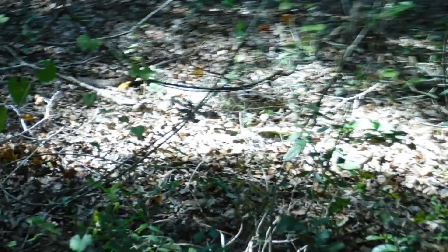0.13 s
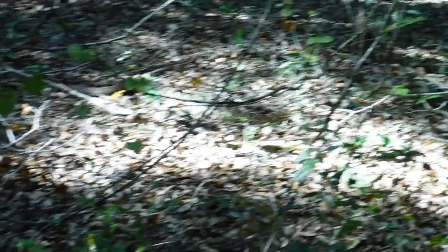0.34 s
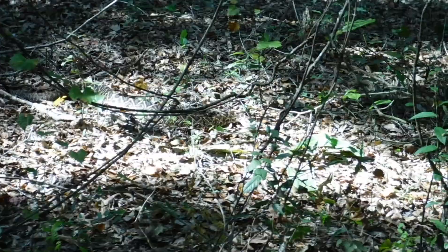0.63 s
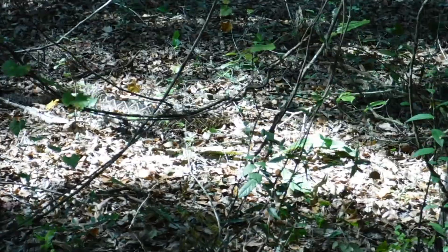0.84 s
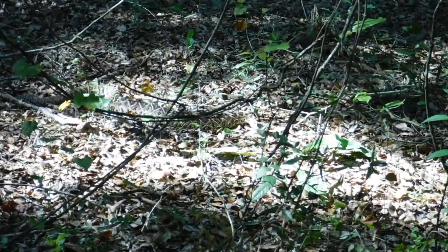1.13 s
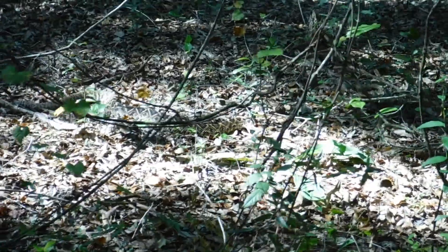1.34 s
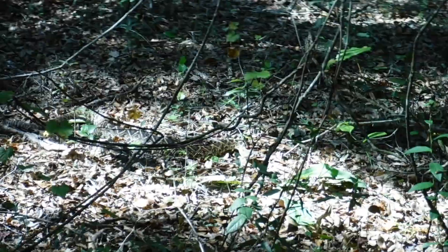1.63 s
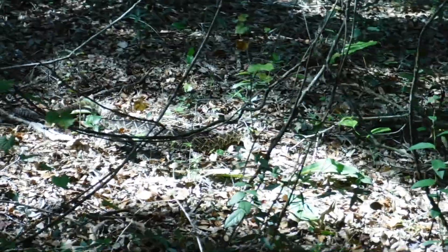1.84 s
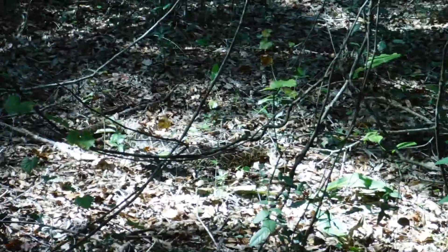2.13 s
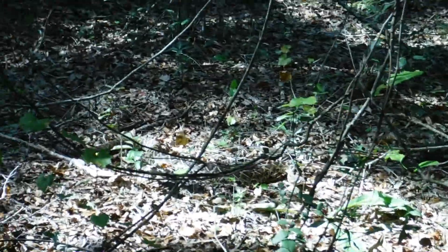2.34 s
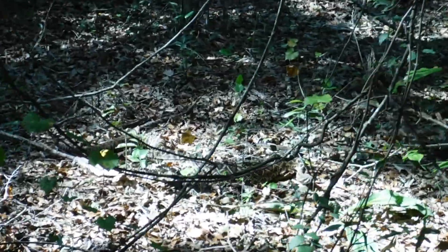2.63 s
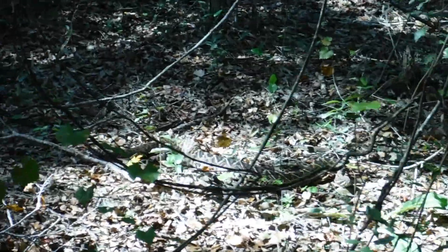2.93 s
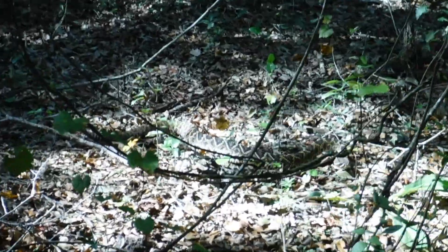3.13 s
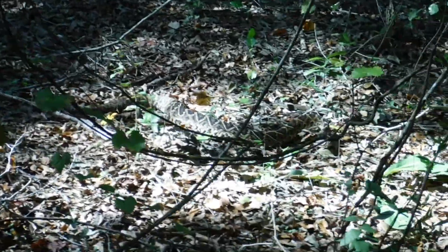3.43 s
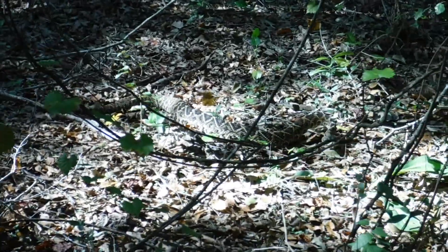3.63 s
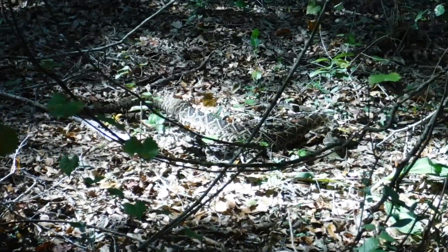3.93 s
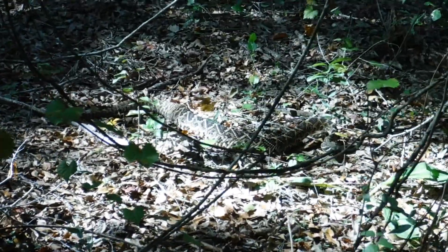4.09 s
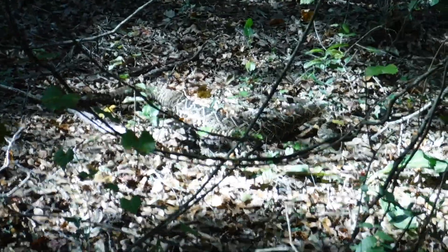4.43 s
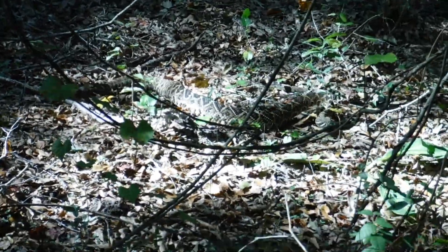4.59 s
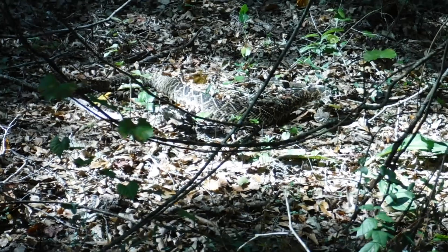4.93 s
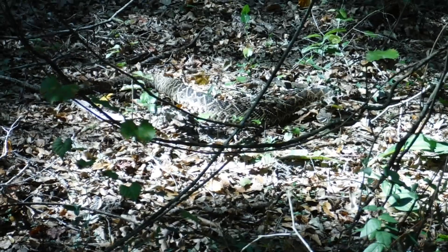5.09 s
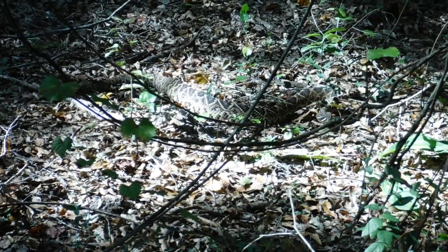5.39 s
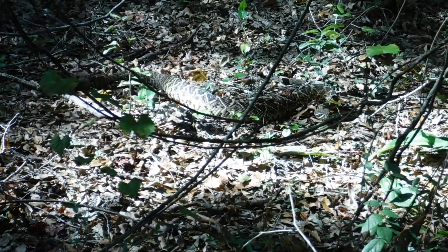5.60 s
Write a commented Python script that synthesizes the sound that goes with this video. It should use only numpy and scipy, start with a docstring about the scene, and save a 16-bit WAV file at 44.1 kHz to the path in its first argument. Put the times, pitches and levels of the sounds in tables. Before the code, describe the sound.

A large snake moves through dry leaf litter close to the microphone, starting at once with a crisp burst of crackling over the hiss of sliding scales. It pushes in uneven surges: from the start to about 0.7 seconds, from 1 to 1.5, briefly near 1.9, and from 2.3 to 3.1. Leaves buckle with sharp, bright clicks, and twigs snap near 0.4, 0.7, 1 and 1.7 seconds, loudest at 2. A soft, hollow ground thump comes at 1.8 seconds and a weaker one at 2, while a faint low rumble swells and fades. After a small push and snap around 3.4 seconds, the rustle sinks to a faint creep with scattered ticks. The woodland behind stays very quiet throughout: still air, faint insects, a distant low hum and a hollow drone. At about 5.2 seconds a far bird gives one faint, thin, falling call.

```python
"""Dry leaves crackle close to the microphone: a large snake pushes through the litter of a woodland floor in
several surges, then settles to a faint creep. Its scales hiss, leaves buckle and twigs snap, each break shaking
the litter around it; a low rumble swells and two of the snaps land with a soft, deep thud. Farther off the wood
is quiet: faint insects, a hum, a hollow drone and, late on, one thin falling bird call."""
import sys
import numpy as np
from scipy import signal
from scipy.fft import rfft, irfft
from scipy.io import wavfile
from scipy.ndimage import uniform_filter1d

SR = 44100
rng = np.random.default_rng(int(sys.argv[2]) if len(sys.argv) > 2 else 0)


def log_audio(samples):
    """Write samples as a 16-bit WAV file to the path given in sys.argv[1]."""
    # one column per channel
    frames = np.atleast_2d(samples).T
    # limit to full scale, then quantise
    limited = np.clip(frames, -1, 1)
    pcm = np.round(limited * 32767).astype(np.int16)
    wavfile.write(sys.argv[1], SR, pcm)


N = 253575


def undb(db):
    """Decibels to gain."""
    return 10 ** (np.asarray(db) / 20)


def unit(x):
    """Scale to rms 1."""
    return x / np.sqrt(np.mean(x ** 2))


def curve(table):
    """Rows of (time, value), joined by straight lines."""
    return np.interp(np.arange(N) / SR, *np.transpose(table))


def add(out, s, sound):
    """Mix a sound in at s seconds."""
    i = max(int(s * SR), 0)
    out[i:i + len(sound)] += sound[:len(out) - i]


def response(spectrum, size=4096):
    """Causal impulse response of unit energy with the given spectrum."""
    hz, db = np.transpose(spectrum)
    f = np.maximum(np.arange(size // 2 + 1) * SR / size, 1)
    gain = undb(np.interp(np.log(f), np.log(hz), db))
    cepstrum = irfft(np.log(gain))
    cepstrum[1:size // 2] *= 2  # fold to minimum phase
    cepstrum[size // 2 + 1:] = 0
    h = irfft(np.exp(rfft(cepstrum)))
    return h / np.linalg.norm(h)


def through(x, h):
    """Pass a sound through an impulse response."""
    return signal.fftconvolve(x, h)[:len(x)]


def ring(x, hz, width_hz):
    """One resonance, gain 1 at its centre."""
    return signal.lfilter(*signal.iirpeak(hz, hz / width_hz, fs=SR), x)


def ring_twice(x, hz, width_hz):
    """The same resonance twice over, for steeper skirts."""
    return ring(ring(x, hz, width_hz), hz, width_hz)


def drift(per_s):
    """Smooth random wander of rms 1."""
    k = int(SR / per_s)
    return unit(uniform_filter1d(np.repeat(rng.standard_normal(N // k + 1), k), k)[:N])


def attack_hold_release(start_s, attack_s, hold_s, release_s):
    """Gain that rises evenly to 1, holds and dies away."""
    t = np.arange(N) / SR - start_s
    return np.clip(t / attack_s, 0, 1) * np.exp(-np.maximum(t - attack_s - hold_s, 0) / release_s)


def fracture(splinter_db, decay_s, size=2048):
    """One sharp break followed by a dying spray of splinters."""
    t = np.arange(size) / SR
    spray = rng.standard_normal(size) * np.exp(-t / decay_s) * (1 - np.exp(-t / 0.00019))
    spray *= undb(splinter_db) / np.linalg.norm(spray)
    spray[0] = 1
    return spray


# The snake's pushes, close to the microphone: start t/s, attack/s, hold/s, rustle level/dB
SNAKE_PUSHES = [(-0.02, 0.016, 0.026, -32.5), (0.04, 0.082, 0.32, -39.5), (0.463, 0.063, 0.04, -40),
                (0.6, 0.04, 0.082, -48.5), (0.961, 0.17, 0.28, -39), (1.201, 0.047, 0.051, -36),
                (1.42, 0.048, 0.13, -46), (1.81, 0.04, 0.19, -44.5), (2.351, 0.054, 0.035, -33),
                (2.455, 0.022, 0.021, -39), (2.584, 0.083, 0.3, -41.5), (3.0, 0.03, 0.099, -47),
                (3.377, 0.044, 0.036, -45.5), (3.477, 0.019, 0.032, -49.5)]
# Its slow creep between pushes: t/s, rustle level/dB
SNAKE_CREEP = [(0.0, -40.5), (0.9, -58.5), (1.72, -50.5), (2.16, -55), (3.3, -52), (3.65, -57),
               (4.17, -57.5), (4.35, -61), (4.75, -66.5), (5.17, -71), (5.23, -61.5), (5.75, -63.5)]


def litter_stirring(shake_db=-30.5, bend_s=0.0081, settle_s=0.031):
    """Rustle level in dB: the creep, the pushes, and leaves shaken as a leaf or twig bends and breaks."""
    power = undb(curve(SNAKE_CREEP)) ** 2
    for s, attack_s, hold_s, db in SNAKE_PUSHES:
        power += (undb(db) * attack_hold_release(s, attack_s, hold_s, release_s=0.045)) ** 2
    t = np.arange(N) / SR
    for s, db, *_ in LEAF_CRACKS + TWIG_SNAPS:
        near = slice(max(int((s - .5) * SR), 0), int((s + .5) * SR))
        shake = np.exp(-np.maximum((s - t[near]) / bend_s, (t[near] - s) / settle_s))
        power[near] += (undb(db + shake_db) * shake) ** 2
    return 10 * np.log10(power)


# Spectrum of the dry surface leaves at close range: f/Hz, level/dB
LEAF_SPECTRUM = [(1200, -25.5), (2200, -20), (3100, -14.5), (4300, -12), (5400, -5), (6200, -3),
                 (7000, -6.5), (8300, -11), (10000, -14.5), (12500, -16), (16000, -22.5)]
# Spectrum of the deeper litter under the snake: f/Hz, level/dB
DEEP_LITTER_SPECTRUM = [(100, -27), (280, -4.5), (700, -3), (1000, -1.5), (1700, 0.5), (2400, -6),
                        (3500, -5), (5000, -2), (9000, -47.5)]


def rustle(fractures_per_s=2600, pings_per_s=190, ping_db=-2.5, clump_db=1.5, ordinary_push_db=-40):
    """Thousands of tiny fractures and pings of single leaves, in clumps, over the hiss of scales sliding."""
    level_db = litter_stirring()
    push_db = level_db - ordinary_push_db
    clumps = undb(clump_db * drift(130))
    # in a fast surge the sliding hiss fills the gaps between the fractures
    slide = undb(-8 + 0.23 * (level_db - np.median(level_db)))

    def breaks(per_s, spread_db=5, largest_db=19.5):
        """Impulses at random moments: many small, a few large."""
        when, size = rng.random((2, N))
        return (when < per_s / SR) * undb(np.minimum(-spread_db * np.log(size), largest_db))

    def grains(sizes, colour_db=4):
        """The fractures in one band, each with its own strength there, plus the sliding hiss."""
        ticks = sizes * undb(colour_db * rng.standard_normal(N)) * rng.choice([-1, 1], N)
        return unit(unit(ticks) + slide * rng.standard_normal(N))

    sizes = breaks(fractures_per_s)
    edges_hz = [1500, 4200, 6200, 8200, 11500, 17000]
    crackle = sum(signal.sosfilt(signal.butter(2, band, "band", fs=SR, output="sos"), grains(sizes))
                  for band in zip(edges_hz, edges_hz[1:]))
    # each leaf has its own pitch and rings for about a millisecond
    pings = sum(ring_twice(breaks(pings_per_s), hz, width_hz=1100) for hz in range(3400, 15000, 750))
    leaves = unit(crackle) + undb(ping_db) * unit(pings)
    surface = unit(clumps * through(leaves, response(LEAF_SPECTRUM)))
    treble = signal.sosfiltfilt(signal.butter(2, 8600, "high", fs=SR, output="sos"), surface)
    surface += treble * (undb(0.046 * push_db) - 1)  # harder pushes are brighter
    crunch = unit(clumps * through(grains(sizes), response(DEEP_LITTER_SPECTRUM)))
    crunch_db = -50 + 0.73 * push_db  # the deeper litter follows the push less steeply
    return surface * undb(level_db) + crunch * undb(crunch_db)


# Spectrum of the still air among the trees: f/Hz, level/dB
AIR_SPECTRUM = [(20, -8), (85, -7.5), (150, -8), (290, -12.5), (600, -18), (850, -17.5), (1030, -22),
                (1570, -17), (1900, -25), (3500, -26), (6000, -22.5), (9000, -28.5), (15800, -33.5)]
# Tones of the far hum: f/Hz, level/dB against the main tone
HUM_TONES = [(138.2, 0), (116.7, -5.5)]
# Slow course of its main tone at the microphone: t/s, level/dB
HUM_COURSE = [(0.0, -64), (1.4, -73), (1.9, -61.5), (2.5, -62.5), (3.0, -71.5), (4.2, -70.5), (4.55, -64),
              (5.75, -65.5)]


def woodland(air_db=-56.5, drone_db=-64.5, insect_db=-72.5):
    """Still air all around, with a far hum, a hollow distant drone and a faint insect chorus."""
    air = unit(through(rng.standard_normal(N), response(AIR_SPECTRUM)))
    air *= undb(air_db + .5 * drift(1.68))
    hum = np.zeros(N)
    for hz, db in HUM_TONES:
        rms = undb(curve(HUM_COURSE) + db + 1.5 * drift(5.7))
        phase = 2 * np.pi * np.cumsum(hz + drift(6)) / SR
        hum += np.sqrt(2) * rms * np.sin(phase)
    drone = unit(ring_twice(rng.standard_normal(N), 1292, width_hz=190))
    drone *= undb(drone_db + drift(6.1))
    insects = unit(ring(ring(rng.standard_normal(N), 5160, width_hz=300), 5130, width_hz=300))
    insects *= undb(insect_db + 2.9 * drift(9))
    return air + hum + drone + insects


# The loudest leaves, close to the microphone: t/s, peak level/dB of the blade, its ring f/Hz
LEAF_CRACKS = [(0.0065, -11.5, 5850), (0.0263, -17, 5700), (0.048, -8.5, 6200), (0.1717, -11, 6130),
               (0.2867, -15.5, 6050), (0.2944, -13.5, 7060), (0.3957, -17, 5500), (0.4038, -14.5, 5940),
               (0.4341, -11, 6600), (0.5407, -21, 5650), (0.7702, -27, 6200), (1.1414, -19, 5130),
               (1.1674, -15, 6150), (1.3138, -18.5, 5800), (1.3763, -17, 6200), (1.4994, -24, 6700),
               (1.8141, -23, 7400), (1.894, -15.5, 6650), (1.9097, -19, 6950), (2.1532, -29, 5900),
               (2.2233, -19.5, 5270), (2.394, -16.5, 6550), (2.485, -20.5, 5800), (2.515, -15.5, 6200),
               (2.7085, -19.5, 5930), (2.8057, -18, 6000), (2.8919, -17, 6000), (2.917, -21, 6800),
               (2.9861, -13.5, 6950), (3.072, -20, 6250), (3.0994, -25, 6630), (3.2172, -27.5, 6950),
               (3.4163, -23.5, 6450), (3.7529, -35, 6600), (3.8398, -35, 6950), (3.895, -33.5, 5400),
               (4.1764, -33.5, 5750), (4.2346, -36, 5800), (4.3873, -34, 5250), (5.035, -42, 6000),
               (5.3804, -33, 6540), (5.4143, -37, 6900), (5.6072, -36, 6000)]


def leaf_cracks(blade_s=.00013, tear_db=-4.5, edge_db=-11, edge_spread_db=1.5):
    """A leaf buckles: its blade swells and rings for half a millisecond, then its torn edge splinters."""
    out, colour, t = np.zeros(N), response(LEAF_SPECTRUM), np.arange(2048) / SR
    # the brightness of the torn edge varies from leaf to leaf
    edge_gains = undb(edge_db + edge_spread_db * rng.standard_normal(len(LEAF_CRACKS)))
    for (s, db, hz), edge_gain in zip(LEAF_CRACKS, edge_gains):
        blade = unit((t / blade_s) ** 2 * np.exp(-t / blade_s) * np.sin(2 * np.pi * hz * t))
        tear = unit(through(fracture(splinter_db=9.5, decay_s=0.0033), colour))
        edge = unit(ring_twice(fracture(splinter_db=0, decay_s=.0015), 12000, width_hz=6000))
        size = undb(db) / blade.max()
        add(out, s - blade_s, size * blade)
        # it tears just after the top of the swell
        add(out, s + 2 * blade_s, size * (undb(tear_db) * tear + edge_gain * edge))
    return out


# Twigs under the snake, close by: t/s, peak level/dB, knock level/dB against the split, ring f/Hz
TWIG_SNAPS = [(0.4117, -8, -6, 3150), (0.6990, -9.5, -7, 5430), (0.9858, -12, -4, 1370),
              (1.7268, -12.5, -23, 5800), (2.0171, -5.5, 2.5, 4330), (2.2495, -17.5, -5, 3000),
              (2.3108, -23.5, 17, 1700), (2.7515, -19.5, -9, 400), (2.7926, -22.5, 4, 450),
              (3.4363, -18, -16, 1240), (4.156, -34.5, -6, 3300)]
# Spectra of the bright split and of the woody knock: f/Hz, level/dB
SPLIT_SPECTRUM = [(200, -18), (2200, -7), (3800, -2), (6000, -1), (7500, -4), (10000, -16.5), (16000, -21)]
KNOCK_SPECTRUM = [(60, -8), (200, -2.5), (750, 6), (1000, 0), (1700, 0), (2300, -5.5), (3500, -3),
                  (7000, -3), (16000, -55)]


def twig_snaps(ring_db=0.5):
    """A twig breaks: a bright split, a dull woody knock and a brief ring."""
    out = np.zeros(N)
    for s, db, knock_db, hz in TWIG_SNAPS:
        split = through(fracture(splinter_db=0.5, decay_s=0.0019), response(SPLIT_SPECTRUM))
        knock = through(fracture(splinter_db=-3.5, decay_s=0.0012), response(KNOCK_SPECTRUM))
        snap = split + undb(knock_db) * knock
        snap += undb(ring_db) * ring(snap, hz, width_hz=700)
        add(out, s, snap / np.abs(snap).max() * undb(db))
    return out


def rumble(crest_s=2.2, width_s=0.95, crest_db=-64.5):
    """A soft low rumble swells and fades near the microphone."""
    swell = np.exp(-((np.arange(N) / SR - crest_s) / width_s) ** 2 / 2)
    low_noise = unit(ring_twice(rng.standard_normal(N), 60, width_hz=120))
    return low_noise * swell * undb(crest_db + 2 * drift(13))


# Low thuds beneath breaking twigs, close by: t/s, peak level/dB
TWIG_THUDS = [(1.849, -20), (2.0172, -33)]
# Spectrum of one thump: f/Hz, level/dB
THUMP_SPECTRUM = [(40, -37), (130, -28), (200, -4), (320, -0.5), (450, -12.5), (600, -19), (900, -37),
                  (1250, -24), (2200, -27.5), (9000, -45)]


def twig_thuds():
    """Breaking twigs give soft, hollow low bumps that die within two cycles."""
    out, bump = np.zeros(N), response(THUMP_SPECTRUM)
    for s, db in TWIG_THUDS:
        add(out, s, bump / np.abs(bump).max() * undb(db))
    return out


# Harmonics of the bird, deep among the trees: multiple of the pitch, relative level/dB at quarter effort
BIRD_HARMONICS = [(2, -8), (3, 0), (4, -29)]


def bird(start_s=5.23, length_s=0.41, fade_s=0.025, waver=0.0062, rasp_db=-7, thinning=0.42):
    """A far scream that slides down, hoarse and full at first, then thinning to one whistle."""
    effort = attack_hold_release(start_s, attack_s=0.03, hold_s=0.04, release_s=0.062)
    pitch_hz = 1976 + 165 * effort
    level_db = -65 + 5 * effort
    t = np.arange(N) / SR - start_s
    sounding = np.clip(np.minimum(t, length_s - t) / fade_s, 0, 1)
    phase = 2 * np.pi * np.cumsum(pitch_hz * (1 + waver * drift(250))) / SR
    # as the effort drops, the weaker harmonics fall away
    thinness = 1 + thinning * (0.5 - 2 * effort)
    tone = sum(undb(db * thinness) * np.sin(k * phase) for k, db in BIRD_HARMONICS)
    rasp = effort ** 2 * np.sin(3.5 * phase)  # halfway between two harmonics
    return (tone + undb(rasp_db) * rasp) * sounding * undb(level_db)


def scatter(x, wet_db, decay_s):
    """Diffuse reflections that reach the microphone from ground, stems and trunks."""
    t = np.arange(SR // 2) / SR
    h = rng.standard_normal(len(t)) * np.exp(-t / decay_s) * (1 - np.exp(-t / 0.0013))
    return undb(wet_db) * through(x, h / np.linalg.norm(h))


def scene():
    """One microphone in the wood: the snake close by, the bird deep among the trees."""
    litter = rustle() + leaf_cracks() + twig_snaps()
    call = bird()
    near = litter + scatter(litter, wet_db=-14.5, decay_s=0.0099) + twig_thuds() + rumble()
    far = call + scatter(call, wet_db=-0.5, decay_s=0.03) + woodland()
    return (near + far)[None]


def record(dry):
    """The recorder cuts the treble steeply above 15650 Hz."""
    return signal.sosfilt(signal.ellip(10, .2, 70, 15650, fs=SR, output="sos"), dry)


dry = scene()
out = record(dry)
log_audio(out)
```